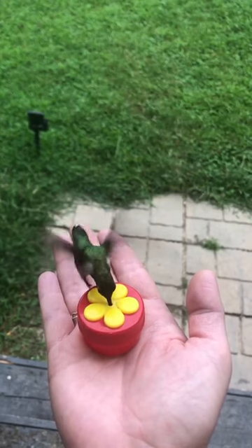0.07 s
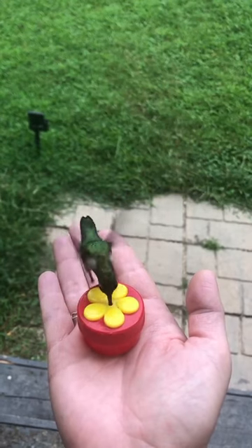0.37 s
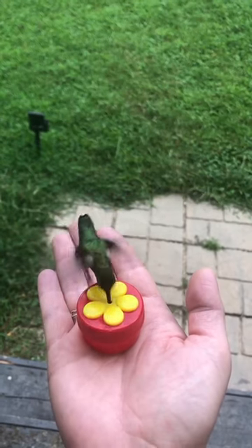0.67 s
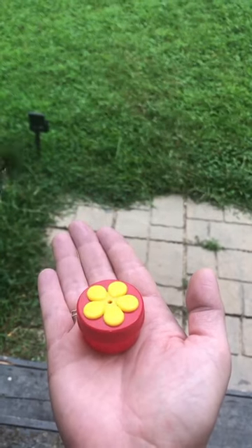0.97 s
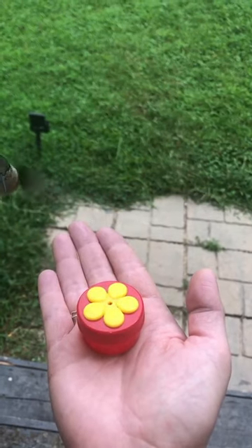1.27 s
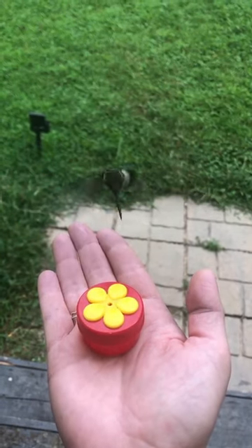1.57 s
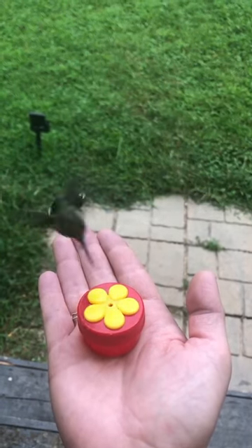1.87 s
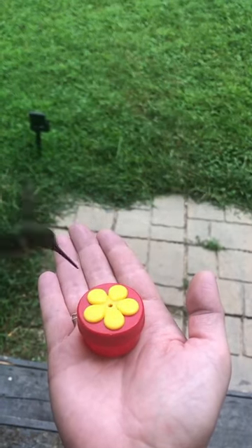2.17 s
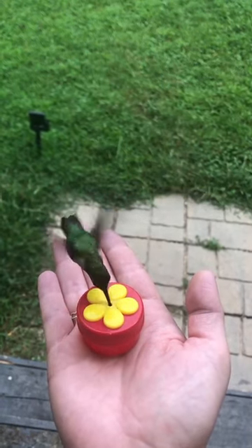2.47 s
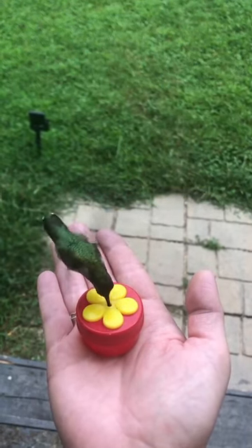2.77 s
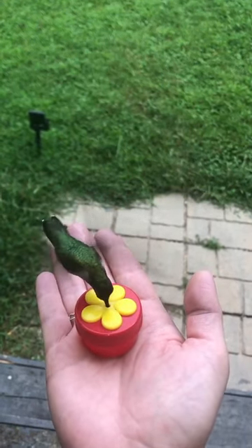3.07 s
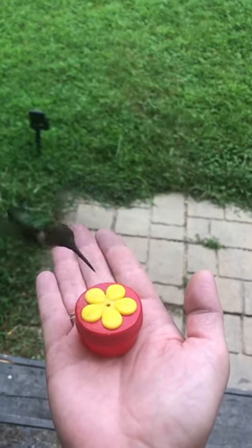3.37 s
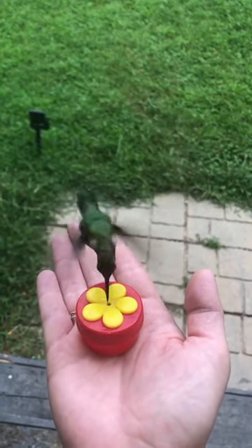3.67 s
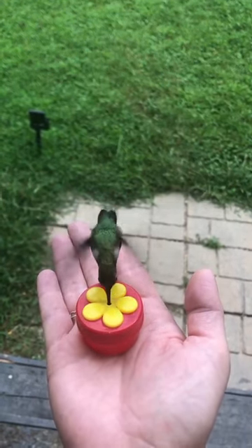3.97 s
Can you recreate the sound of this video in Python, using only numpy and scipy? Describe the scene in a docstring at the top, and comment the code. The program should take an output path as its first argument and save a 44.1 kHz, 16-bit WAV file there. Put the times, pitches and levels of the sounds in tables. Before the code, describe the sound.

The low, whirring hum of a hummingbird's wings rises and falls close by in a garden. Partway through, the bird lets out quick, high, falling chirps, while faint insects and a soft hiss continue behind.

```python
"""A hummingbird hovers close by at a hand-held garden feeder, its wings humming and swishing.
Periodic strokes give a harmonic hum and pulses of air noise, both louder at each dart.
Thin whistles and falling chits, made raspy by irregular vibration, reflect off nearby surfaces.
A steady insect chorus and soft background hiss lie behind; one faint tick sounds near the end."""
import sys
import numpy as np
from scipy import signal
from scipy.fft import rfft, irfft
from scipy.io import wavfile

SR = 44100
rng = np.random.default_rng(int(sys.argv[2]) if len(sys.argv) > 2 else 0)


def digitize_waveform(pressure):
    """Quantize a signal to 16-bit integers and store it at the path in sys.argv[1].

    Rows of a 2-D input are taken as channels; values are limited to [-1, 1].
    """
    field = np.atleast_2d(pressure).T
    bounded = np.clip(field, -1, 1)
    quanta = np.round(bounded * 32767).astype(np.int16)
    wavfile.write(sys.argv[1], SR, quanta)


N = 176400
T = np.arange(N) / SR
BAND_LIMIT_HZ = 13150

# wingbeat frequency (time [s], rate [Hz])
WINGBEAT_RATE = [(0.0, 46.5), (0.09, 49.5), (0.17, 47.5), (0.25, 49.5), (0.29, 59.5), (0.34, 49.9),
                 (0.39, 53.5), (0.5, 49.8), (0.54, 57), (0.57, 49.3), (0.65, 47.7), (0.72, 56), (0.8, 57.8),
                 (0.87, 48.2), (0.91, 59), (0.94, 51.5), (1.06, 56.8), (1.09, 52.6), (1.26, 52.5),
                 (1.35, 48.5), (1.41, 54.7), (1.66, 55), (1.7, 51.3), (1.81, 58.3), (1.845, 53),
                 (1.885, 59.8), (1.94, 51), (2.07, 56), (2.2, 50.7), (2.25, 56), (2.28, 52.5), (2.31, 57.5),
                 (2.36, 54.5), (2.55, 53.3), (2.8, 54), (2.85, 57), (2.9, 54.5), (3.04, 55.6), (3.07, 51),
                 (3.14, 59.6), (3.24, 48.8), (3.34, 53.5), (3.46, 53.5), (3.495, 50.3), (3.53, 54.5),
                 (3.6, 51), (3.77, 52.3), (3.81, 55.8), (3.9, 53), (4.0, 52.6)]
# wing loudness (time [s], stroke tone level [dB], overtone level [dB])
WING_LEVELS = [(0.0, -44, -52), (0.18, -48, -58), (0.25, -50, -53), (0.29, -36.5, -45.5),
               (0.34, -45, -52.5), (0.39, -41, -49), (0.5, -44.5, -51.5), (0.55, -37.5, -47.5),
               (0.58, -47.5, -57.5), (0.65, -49.5, -55), (0.73, -40.5, -45), (0.79, -36, -46),
               (0.845, -52, -51), (0.895, -37.5, -43.5), (0.95, -44, -52.5), (1.05, -43.5, -43.5),
               (1.1, -43.5, -48), (1.36, -45.5, -50.5), (1.4, -44.5, -46), (1.44, -47, -50),
               (1.49, -41.5, -46.5), (1.7, -43.5, -47.5), (1.86, -44, -45), (1.89, -38.5, -43.5),
               (1.93, -44.5, -50), (2.07, -41.5, -46.5), (2.19, -43.5, -49), (2.28, -38.5, -45),
               (2.42, -43, -48), (2.75, -41.5, -48), (2.95, -41, -47), (3.07, -42, -47.5),
               (3.13, -35.5, -42.5), (3.19, -40, -43.5), (3.24, -41.5, -52.5), (3.32, -38, -47),
               (3.52, -41.5, -46.5), (3.66, -37, -45.5), (3.77, -43.5, -48), (3.85, -39.5, -45),
               (4.0, -40.5, -49)]
# wingbeat overtones (harmonic number [1], relative level [dB])
WING_OVERTONES = [(3, -3.5), (4, -4.5), (5, -9), (6, -10), (7, -12.5), (8, -11), (9, -18.5), (10, -18),
                  (13, -28.5), (15, -33.5)]
# swish of the strokes (frequency [Hz], relative spectral density [dB])
SWISH_SPECTRUM = [(400, -20), (800, 4), (1300, 1.5), (2400, 3), (3500, -0.5), (5000, -8), (8000, -14),
                  (13000, -6.5)]
# air stirred by the wings (frequency [Hz], relative spectral density [dB])
WASH_SPECTRUM = [(25, -31), (45, -17), (70, -3.5), (150, 5.5), (300, -3), (500, -2.5), (700, -20),
                 (1200, -32), (2500, -44)]
# darts of the bird (centre time [s], width [s], level [dB])
DARTS = [(0.277, 0.017, -58), (0.373, 0.042, -63.5), (0.727, 0.041, -59.5), (0.779, 0.028, -57.5),
         (0.88, 0.025, -55), (1.393, 0.017, -62), (1.798, 0.028, -60), (1.869, 0.04, -66.5),
         (2.276, 0.11, -65.5), (3.13, 0.07, -61.5)]
# hard wing flicks in a dart (frequency [Hz], relative spectral density [dB])
FLICK_SPECTRUM = [(100, -14), (300, -17), (600, 8), (900, -6.5), (1400, -10.5), (3000, -11), (6000, -12),
                  (13000, -23)]
# insect chorus (centre frequency [Hz], bandwidth [Hz], level [dB])
INSECT_BANDS = [(6050, 230, -69), (6405, 390, -65.5), (7194, 300, -66), (7676, 370, -65.5)]
# background hiss (frequency [Hz], relative spectral density [dB])
HISS_SPECTRUM = [(20, -36), (35, -12), (60, 19), (200, 11), (500, 1.5), (1000, -8.5), (2500, -26),
                 (4800, -14.5), (6500, -13), (8200, -11.5), (9500, -16), (13000, -16.5)]
# whistled notes (onset [s], duration [s], start pitch [Hz], middle pitch [Hz], end pitch [Hz],
# level [dB], relative octave level [dB], roughness [fraction of pitch])
WHISTLES = [(0.035, 0.05, 6350, 6720, 6680, -57, -36, 0), (0.096, 0.034, 6080, 5860, 6010, -57.5, -7, .006),
            (0.111, 0.055, 5900, 6230, 6040, -55, -32, 0.01),
            (0.619, 0.022, 4460, 4620, 5040, -63, -3, 0.04),
            (1.167, 0.013, 7450, 7320, 7200, -50, -10, 0.04), (1.168, 0.011, 6570, 6440, 6400, -43, -23, 0),
            (1.175, 0.02, 6355, 6120, 6210, -41.5, -9.5, .01),
            (1.199, 0.017, 6260, 6210, 6430, -44, -12, 0.02),
            (1.232, 0.013, 6660, 6480, 6700, -44.5, -22, .012),
            (1.248, 0.031, 6490, 6360, 6290, -39, -21, 0.02),
            (1.845, 0.017, 6510, 6404, 6220, -41.5, -34, 0.02),
            (1.86, 0.013, 6040, 5820, 5570, -41.5, -12, 0)]
# reflections off hand, deck and wall (delay [s], treble gain [dB])
ECHOES = [(.0045, -9), (.008, -0.5), (.024, -7)]
# falling chits (onset [s], duration [s], start pitch [Hz], end pitch [Hz], level [dB],
# roughness [fraction of pitch], fundamental gain [dB], rasp rate [Hz])
CHITS = [(0.517, 0.023, 2070, 1510, -58.5, 0.08, 8, 1490), (1.203, 0.009, 6000, 3730, -51, .05, -4, 900),
         (1.239, 0.044, 5730, 4630, -48.5, .09, -0.5, 644), (1.267, .031, 4730, 2950, -51, .14, -6, 1180),
         (1.362, 0.066, 3390, 2250, -49.5, .19, -5, 1560), (1.474, 0.024, 3340, 1784, -48.5, 0.07, 1, 1500),
         (1.523, 0.022, 3235, 1940, -52.5, 0.06, 4, 1500), (1.583, 0.018, 3360, 1760, -51, .09, 1.5, 1500),
         (1.651, 0.019, 2956, 1640, -52, 0.07, 4.5, 1500), (1.767, 0.044, 3640, 1967, -51, .18, 1.5, 1470),
         (1.849, 0.037, 5230, 4600, -48, 0.07, -1.5, 746),
         (1.88, 0.034, 3600, 2454, -48.5, 0.12, -2.5, 1210),
         (2.033, 0.038, 2740, 1808, -54.5, 0.12, -4, 1510),
         (2.136, 0.023, 2580, 1456, -52.5, 0.08, -1.5, 1490)]
# response of the bird's throat (frequency [Hz], gain [dB])
THROAT_RESPONSE = [(1500, 4), (2500, -3.5), (4000, -3.5), (5500, -1.5), (6600, 5), (8500, -7.5),
                   (11000, -6), (13000, -12)]


def amp(db):
    """Amplitude ratio of a level in decibels."""
    return 10 ** (np.asarray(db) / 20)


def unit_rms(x):
    """Normalisation to unit mean power."""
    return x / np.sqrt(np.mean(x ** 2) + 1e-20)


def gain_at(spectrum, hz):
    """Amplitude gain, interpolated in decibels over log frequency."""
    freqs, db = np.transpose(spectrum)
    return amp(np.interp(np.log(hz + 1), np.log(freqs + 1), db))


def curve(table, column=1):
    """Linear interpolation of a column over time."""
    rows = np.array(table)
    return np.interp(T, rows[:, 0], rows[:, column])


def add(mix, onset, sound):
    """Superposition of a sound from its onset in seconds."""
    part = mix[round(onset * SR):][:len(sound)]
    part += sound[:len(part)]


def phase_of(hz):
    """Phase is the time integral of frequency."""
    return 2 * np.pi * np.cumsum(hz) / SR


def highpass(x, hz, order):
    """Butterworth attenuation below a cutoff."""
    return signal.sosfilt(signal.butter(order, hz, "high", fs=SR, output="sos"), x)


def noise(gain):
    """White noise filtered by gain(Hz), at unit power."""
    return unit_rms(irfft(rfft(rng.standard_normal(N)) * gain(np.fft.rfftfreq(N, 1 / SR)), N))


def coloured(spectrum):
    """Noise shaped by a tabulated spectrum."""
    return noise(lambda hz: gain_at(spectrum, hz))


def wobble(hz):
    """Random fluctuation, mostly slower than the given rate."""
    return noise(lambda f: np.exp(-(f / hz) ** 2))


def gate(t, length, attack_s, release_s):
    """An envelope with quarter-sine edges."""
    rise = np.sin(np.pi / 2 * np.clip(t / attack_s, 0, 1))
    return rise * np.sin(np.pi / 2 * np.clip((length - t) / release_s, 0, 1))


def wing_hum(phase, stroke_db, overtone_db):
    """Periodic force on the air radiates harmonics; two strokes a beat make the second dominant."""
    downstroke_share, snap_above_harmonic = 0.44, 6.3
    envelope = np.sqrt(2) * amp(stroke_db + 0.9 * wobble(55))
    fundamental = amp(-23.5 + 7.1 * wobble(2.3)) * np.cos(phase)
    hum = envelope * (amp(-1) * np.cos(2 * phase) - fundamental)
    overtones = []
    for k, db in WING_OVERTONES:
        snap = (k / snap_above_harmonic) ** 2  # as the downstroke begins
        push_pull = 1j * np.exp(-2j * np.pi * k * downstroke_share)  # as it ends
        overtones.append(amp(db + 1.8 * wobble(53)) * np.cos(k * phase + np.angle(push_pull + snap)))
    return hum + sum(overtones) / np.std(sum(overtones[1:])) * amp(overtone_db - 1)


def wing_swish(puff, overtone_db):
    """Each stroke sheds a puff of air, modulating the amplitude of a bright swish and a low wash."""
    mean_db = overtone_db.mean()
    swish_db = mean_db + 0.71 * (overtone_db - mean_db) - 15  # swells less than the overtones
    swish = amp(swish_db) * unit_rms(coloured(SWISH_SPECTRUM) * (0.47 + puff ** 2))
    wash = amp(overtone_db - 13) * unit_rms(coloured(WASH_SPECTRUM) * (1.8 + puff))
    return swish + wash


def wing_darts(phase, puff):
    """Sharper strokes carry more high harmonics: a dart adds a whirr, noisy flicks and a gust."""
    rise_db_per_harmonic, flutter_db = 1.5, 8
    envelope = sum(amp(db) * np.exp(-2 * ((T - centre) / width) ** 2) for centre, width, db in DARTS)
    whirr = np.zeros(N)
    for k in range(4, 18):
        gain = amp(rise_db_per_harmonic * k + flutter_db * wobble(32))
        whirr += gain * np.sin(k * phase) / (1 + k % 2)  # odd harmonics are halved
    flick = unit_rms(coloured(FLICK_SPECTRUM) * (1.3 + puff ** 4))
    gust = coloured(WASH_SPECTRUM)
    return envelope * (amp(-7) * unit_rms(whirr) + amp(3) * flick + amp(2.5) * gust)


def wings():
    """One slightly irregular oscillation keeps hum, swish and whirr locked in phase."""
    jitter, puff_lead_beats, stroke_asymmetry = 0.013, 0.03, 0.17
    phase = phase_of(curve(WINGBEAT_RATE) * (1 + jitter * wobble(33.5)))
    stroke_db, overtone_db = curve(WING_LEVELS), curve(WING_LEVELS, column=2)
    puff = np.cos(phase + 2 * np.pi * puff_lead_beats) ** 2 * (1 + stroke_asymmetry * np.cos(phase))
    return wing_hum(phase, stroke_db, overtone_db) + wing_swish(puff, overtone_db) + wing_darts(phase, puff)


def insects():
    """Many distant insects sum incoherently into narrow noise bands that tremble and swell."""
    tremble_db, swell_db = 2.5, 1.2
    chorus = np.zeros(N)
    for hz, width, db in INSECT_BANDS:
        envelope = amp(db + tremble_db * wobble(35) + swell_db * wobble(4.2))
        chorus += envelope * noise(lambda f: 1 / np.sqrt(1 + (1.8 * (f - hz) / width) ** 4))
    return chorus


def spread(source, correlation):
    """Partial correlation between two channels widens a random source."""
    mid = np.sqrt((1 + correlation) / 2) * source()
    side = np.sqrt((1 - correlation) / 2) * source()
    return np.array([mid + side, mid - side])


def background_hiss():
    """Soft steady background hiss, centred, with added left-right noise above 5 kHz."""
    side = 0.816 * highpass(coloured(HISS_SPECTRUM), hz=5000, order=6)
    return amp(-56.5) * (coloured(HISS_SPECTRUM) + np.array([side, -side]))


def whistles():
    """Nearly sinusoidal vibration glides through three pitches, with a weaker octave above."""
    out, flutter = np.zeros(N), wobble(620)
    for onset, length, start_hz, middle_hz, end_hz, db, octave_db, roughness in WHISTLES:
        t = np.arange(0, length, 1 / SR)
        hz = np.interp(t, [0, length / 2, length], [start_hz, middle_hz, end_hz])
        phase = phase_of(hz * (1 + roughness * flutter[round(onset * SR):][:len(t)]))
        tone = np.sin(phase) + amp(octave_db) * np.sin(2 * phase)
        add(out, onset, amp(db) * unit_rms(tone) * gate(t, length, attack_s=0.0043, release_s=0.0043))
    return out


def with_reflections(calls):
    """Near surfaces add thin, delayed copies to the direct sound; scattering adds a bright tail."""
    t60_s, build_up_s, tail_db = 0.24, 0.011, -7
    t = np.arange(SR // 2) / SR
    early = np.zeros(len(t))
    for delay, db in ECHOES:
        add(early, delay, amp([db]))
    early = highpass(early, hz=3800, order=2)
    early[0] = 1  # direct path
    envelope = amp(-60 * t / t60_s) * np.minimum(t / build_up_s, 1)
    tails = highpass(rng.standard_normal((2, len(t))) * envelope, hz=3500, order=1)
    mid, side = amp(tail_db) * tails / np.linalg.norm(tails[0])
    side = 0.7 * highpass(side, hz=5500, order=8)  # only the treble is wide
    response = np.array([early + mid + side, early + mid - side])
    return signal.fftconvolve(calls[None], response, axes=1)[:, :N]


def chits():
    """Irregular vibration frequency-modulates a falling harmonic series, smearing it into a rasp."""
    out = np.zeros(N)
    for onset, length, start_hz, end_hz, db, roughness, fundamental_db, rasp_hz in CHITS:
        t = np.arange(0, length, 1 / SR)
        hz = start_hz + (end_hz - start_hz) * (t / length) ** 1.4  # falls ever faster
        phase = phase_of(hz)
        rasp = phase_of(hz * roughness * wobble(rasp_hz)[:len(t)])
        tone = amp(fundamental_db) * gain_at(THROAT_RESPONSE, hz) * np.sin(phase + rasp)
        for k in range(2, 8):
            gain = gain_at(THROAT_RESPONSE, k * hz) * (k * hz < BAND_LIMIT_HZ + hz / 2)
            tone += gain * np.sin(k * (phase + 2 * rasp))  # overtones are twice as rough
        tone = highpass(tone, hz=0.8 * end_hz, order=6)
        add(out, onset, amp(db) * unit_rms(tone) * gate(t, length, attack_s=0.0049, release_s=0.0054))
    return out


def tick():
    """A very short tone with an exponential drop in pitch is heard as a faint, dull tick."""
    onset_s, length_s = 3.363, 0.018
    start_hz, end_hz, drop_s = 1900, 680, 0.0021
    out, t = np.zeros(N), np.arange(0, length_s, 1 / SR)
    hz = end_hz + (start_hz - end_hz) * np.exp(-t / drop_s)
    envelope = amp(-52) * gate(t, length_s, attack_s=0.00075, release_s=0.006)
    add(out, onset_s, envelope * np.sin(phase_of(hz)))
    return out


def scene():
    """The sources superpose in stereo; only the calls carry reflections."""
    foreground = wings() + tick() + with_reflections(whistles() + chits())
    return foreground + spread(insects, correlation=0.72) + background_hiss()


def record(dry):
    """A linear-phase low-pass filter limits the bandwidth."""
    lowpass = signal.firwin(511, BAND_LIMIT_HZ, window=("kaiser", 9), fs=SR)
    return signal.oaconvolve(dry, lowpass[None], "same")


dry = scene()
out = record(dry)
digitize_waveform(out)
```